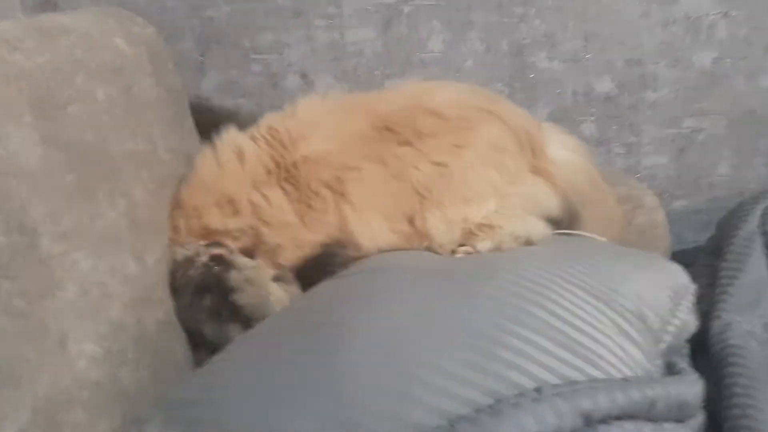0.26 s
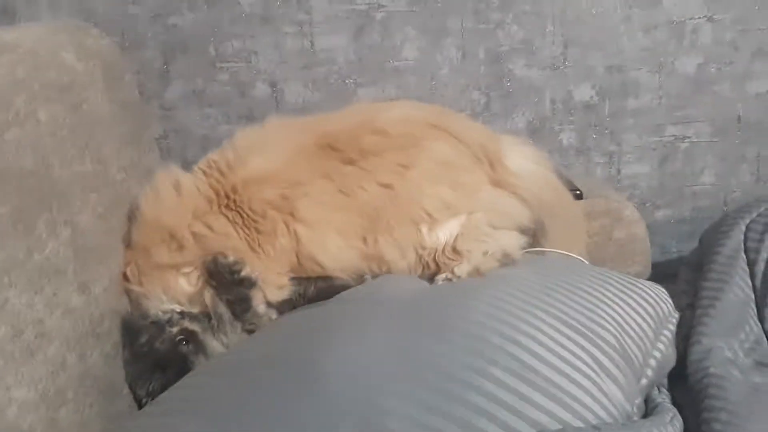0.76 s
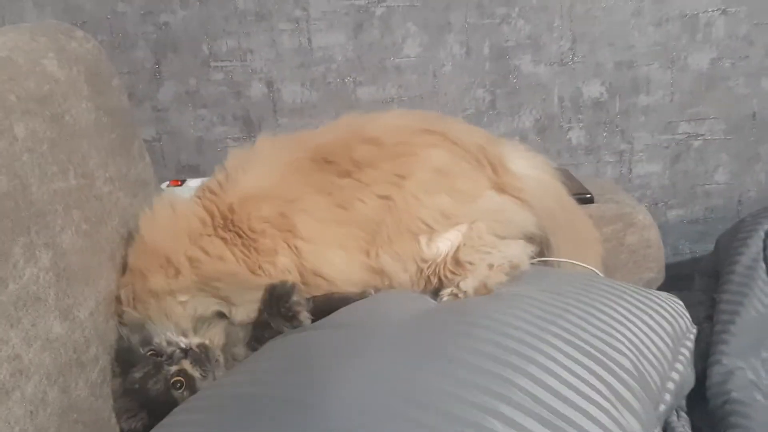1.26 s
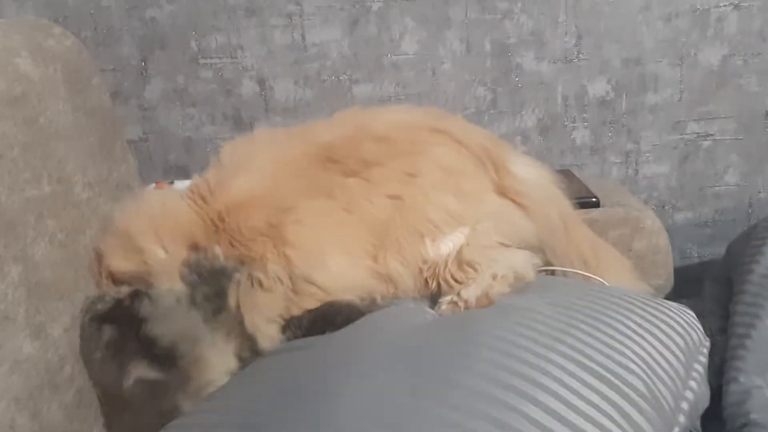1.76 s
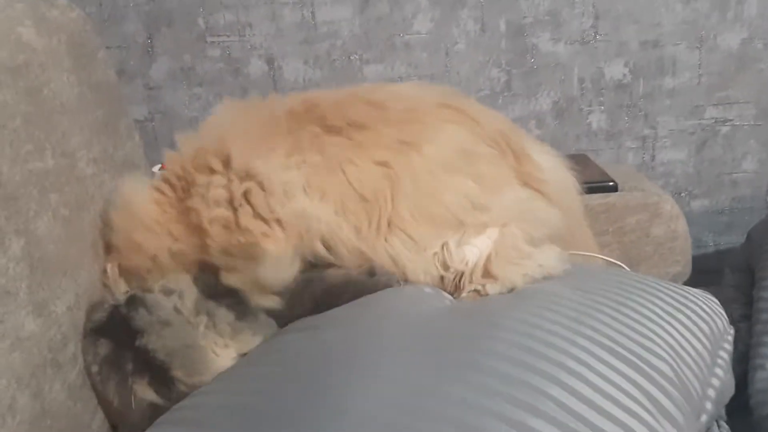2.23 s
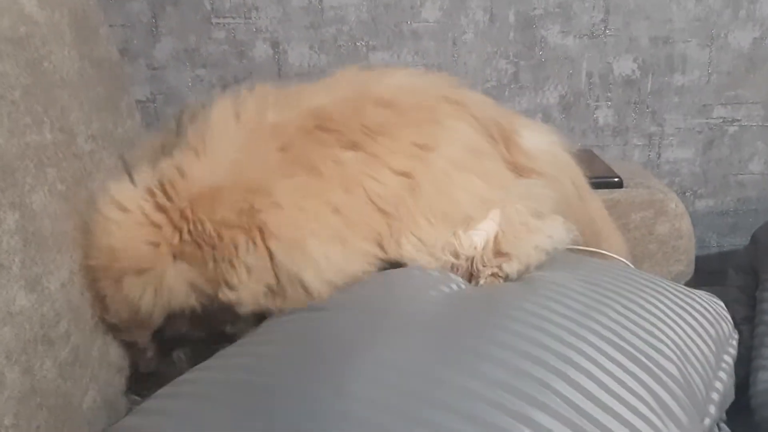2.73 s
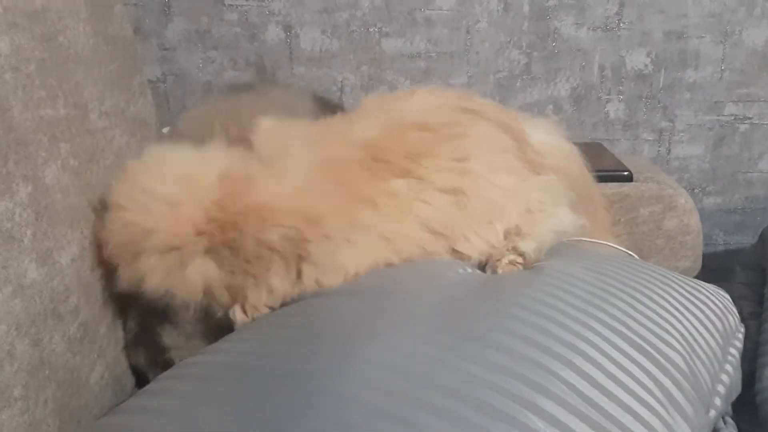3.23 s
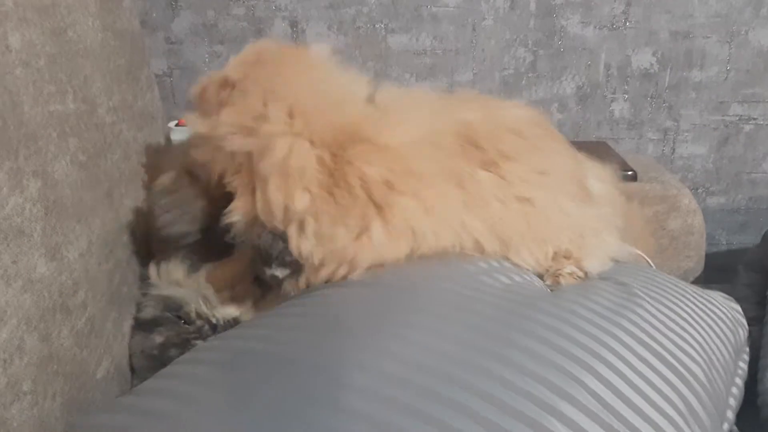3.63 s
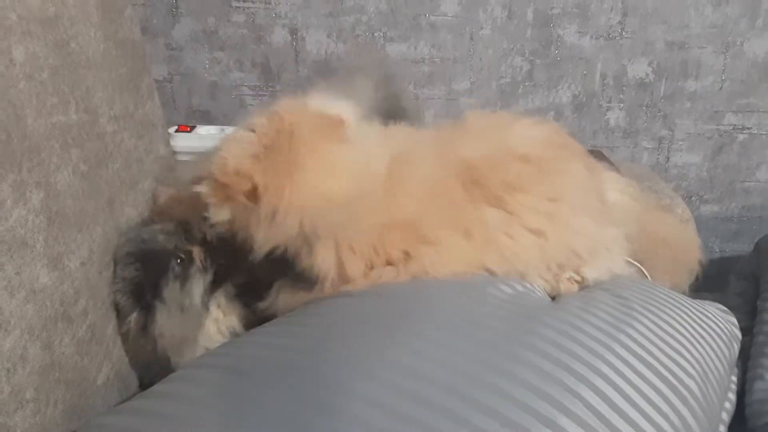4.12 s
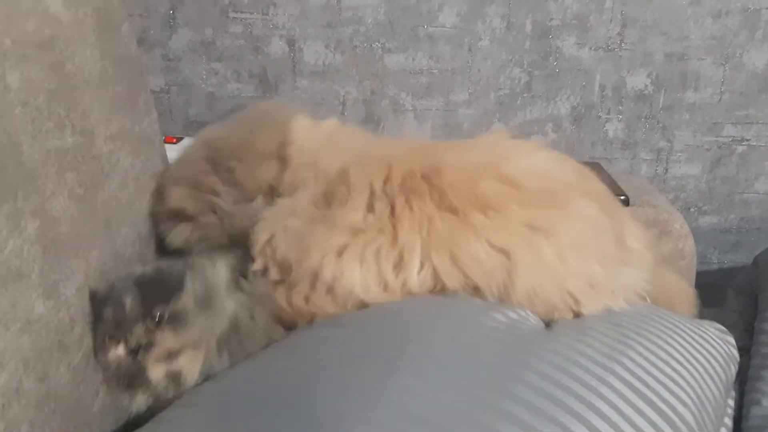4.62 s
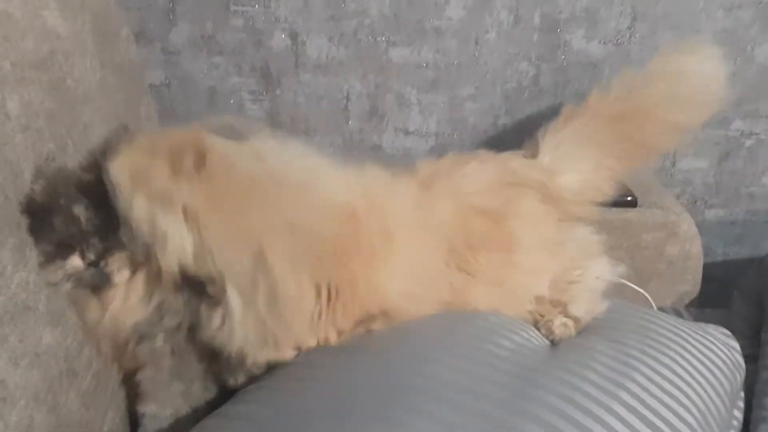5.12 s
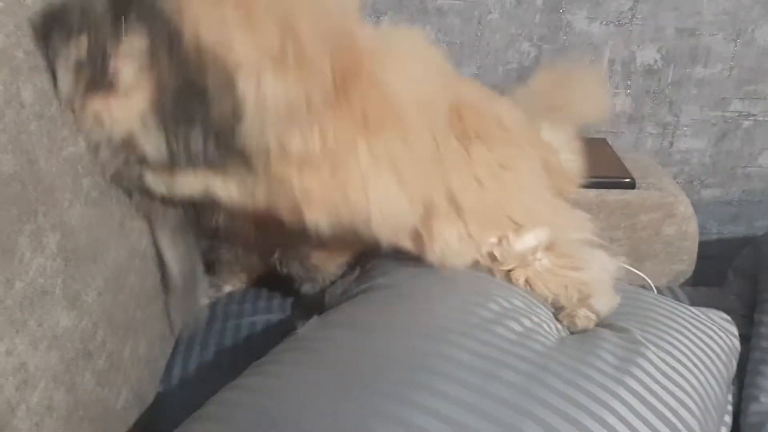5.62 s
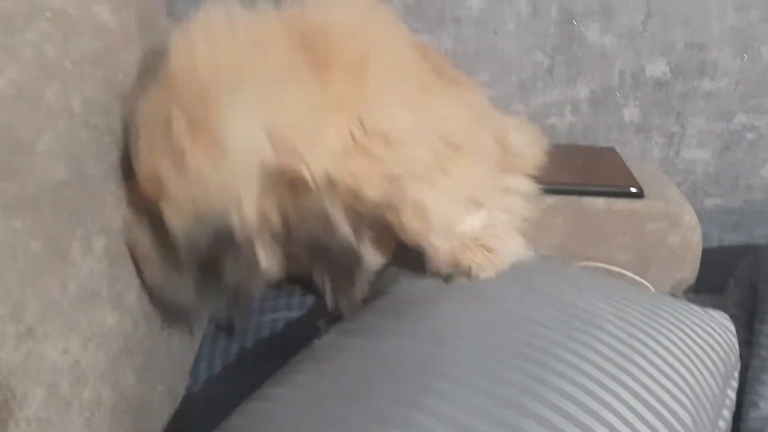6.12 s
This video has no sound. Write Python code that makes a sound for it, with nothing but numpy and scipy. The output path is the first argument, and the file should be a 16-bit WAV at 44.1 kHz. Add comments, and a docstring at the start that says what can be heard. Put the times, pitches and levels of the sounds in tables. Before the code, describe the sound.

Two cats scuffle on a sofa in a small room, heard close and slightly left over a low hum. A rough cry already under way ends in a plunging squeal; a snarl and a soft mew follow. A yelp runs into a yowl and a loud scream, then snarls and a hoarse squall. After that come only low thumps, fur rustles and a sharp late knock.

```python
"""A rough cry is already sounding over a low room hum; it ends in a squeal.
Two cats wrestle on a sofa in a small room: mews, yowls, a scream and a squall, with short snarls and yelps.
Vocal fold pulses and puffs of air ring throat, mouth and upper resonances; effort and an opening mouth brighten.
Bodies excite the sofa's low modes over cushion rumble; filtered noise makes hisses, fur strokes and claw clicks.
Knocks on something hard come late; thin whistles are faint sines. A short room tail surrounds the near sounds."""
import sys
import numpy as np
from scipy import signal
from scipy.fft import rfft, irfft
from scipy.io import wavfile
from scipy.ndimage import uniform_filter1d

SR = 44100
rng = np.random.default_rng(int(sys.argv[2]) if len(sys.argv) > 2 else 0)


def dump_mix(stems):
    """Bounce the given channels to the path in sys.argv[1] as a 16-bit WAV at rate SR."""
    frames = np.atleast_2d(stems).T  # one column per channel
    limited = np.clip(frames, -1, 1)  # hard clip at full scale
    pcm = np.round(limited * 32767).astype(np.int16)
    wavfile.write(sys.argv[1], SR, pcm)


N = 280917


def amp(db):
    """Decibels to gain."""
    return 10 ** (np.asarray(db) / 20)


def unit(x):
    """Scales to an rms of one."""
    return x / np.sqrt(np.mean(x ** 2) + 1e-20)


def steady(x):
    """Holds the rms at one from moment to moment."""
    power = uniform_filter1d(uniform_filter1d(x ** 2, size=700), size=700)
    return x / np.sqrt(abs(power) + 1e-14)


def read(points, hz):
    """Reads a spectrum on a log-frequency axis."""
    f, value = np.transpose(points)
    return np.interp(np.log(hz + 1), np.log(f + 1), value)


def add(mix, start_s, sound):
    """Adds a sound to the mix at start_s, clipped to the mix."""
    at = round(start_s * SR)
    sound = sound[max(-at, 0):]
    part = mix[max(at, 0):][:len(sound)]
    part += sound[:len(part)]


def colour(x, points, size=2048):
    """Causal minimum-phase filter with the given spectrum."""
    log_gain = np.log(amp(read(points, abs(np.fft.fftfreq(size, 1 / SR)))))
    taps = np.fft.ifft(np.exp(np.conj(signal.hilbert(log_gain)))).real
    return signal.oaconvolve(x, taps)[:len(x)]


def wander(n, hz):
    """Smooth random curve of rms one, rolled off above hz."""
    rolloff = 1 + (np.fft.rfftfreq(n, 1 / SR) / hz) ** 4
    return unit(irfft(rfft(rng.standard_normal(n)) / rolloff, n))


def resonate(x, hz, width_hz):
    """A resonance of gain one that follows the curve hz."""
    turn = np.exp(2j * np.pi * np.cumsum(hz) / SR)
    r = np.exp(-np.pi * width_hz / SR)
    return 2 * (turn * signal.lfilter([1 - r], [1, -r], x / turn)).real


def formant(x, hz, width_hz, count=6):
    """A steep-sided resonance: a wider one applied several times over."""
    for _ in range(count):
        x = resonate(x, hz * np.ones(len(x)), np.sqrt(2) * width_hz)
    return x


def pulses(turns, sizes):
    """One band-limited pulse at each whole turn."""
    at = np.flatnonzero(np.diff(np.floor(turns)) > 0)
    late = (np.floor(turns[at + 1]) - turns[at]) / (turns[at + 1] - turns[at])
    k, out = np.arange(-8, 9), np.zeros(len(turns))
    shape = np.sinc(k - late[:, None]) * np.hanning(len(k))
    np.add.at(out, np.clip(at[:, None] + k, 0, len(out) - 1), sizes[at, None] * shape)
    return out


def larynx(hz, rough, jitter, doubling, hiss, clean_hz):
    """Strained folds pulse unevenly, strong-weak; above clean_hz harmonics give way to rushing air."""
    n = len(hz)
    turns = np.cumsum(hz * (1 + jitter * rough * wander(n, 170) + 0.0076 * wander(n, 63))) / SR
    beat = 1 + np.clip(doubling * rough, 0, .9) * np.cos(np.pi * turns)
    folds = steady(pulses(turns, beat * np.exp(0.14 * rough * wander(n, 250))))
    puffs = unit((.35 + np.exp(-(turns % 1) / .22)) * rng.standard_normal(n))
    clean = 1 / (1 + (np.fft.rfftfreq(n, 1 / SR) / clean_hz) ** 8)
    drive = irfft(rfft(folds) * np.sqrt(clean) + rfft(puffs) * np.sqrt(1 - clean), n)
    low_air = irfft(rfft(puffs) * np.sqrt(clean), n)
    return folds, puffs, drive + hiss * (rough + 0.35) * low_air


# throat colour: f/Hz, relative level/dB
THROAT_COLOUR = [(120, -19.5), (220, -5.5), (330, 1.5), (520, -4.5), (760, 5), (1050, 6.5), (1400, -1.5),
                 (2200, -35)]


def throat_part(folds, drive, throat_hz, chest_db):
    """The throat rings and flutters; each closing of the folds also thuds in the chest."""
    throat = steady(colour(formant(drive, throat_hz, 1300), THROAT_COLOUR))
    throat = throat * amp(2.49 * wander(len(drive), 30))
    return throat + amp(chest_db) * steady(formant(folds, 230, 360, count=3))


# mouth colour: f/Hz, relative level/dB
MOUTH_COLOUR = [(500, -1), (900, -13.5), (1200, 1.5), (1900, -1.5), (2080, 1), (2350, -3.5), (2900, 1),
                (3400, -2), (4000, -10), (5500, -34.5), (8000, -67.5)]
TIP_WIDTH_HZ = 146
FIXED_HZ, FIXED_DB = 2270, -14.5  # weak resonance that stays put while the mouth moves


def mouth_part(drive, hz, mouth_hz, width_hz, ring_db, shoulder_db, strain_db):
    """A moving sharp-tipped peak with a shoulder below; higher notes wake a further peak above."""
    peak = formant(drive, mouth_hz, width_hz)
    peak = peak + amp(ring_db) * resonate(peak, mouth_hz, TIP_WIDTH_HZ)
    shoulder = amp(shoulder_db) * formant(drive, 0.72 * mouth_hz, 898)
    strain_gain = amp(strain_db + 11.6 * np.log2(hz / 500))  # 11.6 dB per octave of pitch
    strain = strain_gain * formant(drive, 1.484 * mouth_hz, 1200)
    fixed = amp(FIXED_DB) * formant(drive, FIXED_HZ, 1200)
    return steady(colour(peak + shoulder + strain + fixed, MOUTH_COLOUR))


# upper colour: f/Hz, relative level/dB
UPPER_COLOUR = [(2600, -34.5), (3400, -17.5), (3900, -3), (4700, -4.5), (5400, -4), (6300, -6), (7000, -17),
                (7800, -19.5), (8500, -38.5), (9600, -27.5), (11800, -20.5), (15500, -14)]
MID_EFFORT_DB, MID_MOUTH_HZ = -32.5, 1900
TOP_HZ = 7650


def upper_part(drive, puffs, rough, mouth_hz, upper_hz, spread_db, top_db):
    """The top of the voice is partly air, flutters, and moves slightly with the mouth."""
    n = len(drive)
    air = (drive + 2.5 * rough * puffs) * amp(0.49 * wander(n, 60))
    moving_hz = upper_hz * (mouth_hz / MID_MOUTH_HZ) ** 0.14
    upper = steady(colour(formant(air, moving_hz, 2100) + amp(spread_db) * air, UPPER_COLOUR))
    top = amp(top_db) * unit(formant(air, TOP_HZ, 750))
    return (upper + top) * amp(1.423 * wander(n, 45))


THROAT_DB_PER_EFFORT_DB, UPPER_DB_PER_EFFORT_DB = 0.49, 1.35
THROAT_DB_PER_OCT, UPPER_DB_PER_OCT = -5.5, 1  # per octave of mouth resonance
FADE_S = 0.016
RASP_DB, RASP_HZ = 2.5, 90


def call(rows, throat_db, upper_db, jitter, doubling, hiss, clean_hz, width_hz, ring_db, shoulder_db,
         strain_db, throat_hz, upper_hz, spread_db, top_db, chest_db=-18):
    """Folds and air ring three resonators; a soft call is mostly throat, a hard, open one bright."""
    s, *columns = np.transpose(rows)
    t = np.arange(s[0], s[-1], 1 / SR)
    hz, rough, mouth_hz, effort_db = (np.interp(t, s, c) for c in columns)
    rough = np.clip(rough, 0, 1)
    folds, puffs, drive = larynx(hz, rough, jitter, doubling, hiss, clean_hz)
    throat = throat_part(folds, drive, throat_hz, chest_db)
    mouth = mouth_part(drive, hz, mouth_hz, width_hz, ring_db, shoulder_db, strain_db)
    upper = upper_part(drive, puffs, rough, mouth_hz, upper_hz, spread_db, top_db)

    push_db, opening_oct = effort_db - MID_EFFORT_DB, np.log2(mouth_hz / MID_MOUTH_HZ)
    throat_gain = amp(throat_db + THROAT_DB_PER_EFFORT_DB * push_db + THROAT_DB_PER_OCT * opening_oct)
    upper_gain = amp(upper_db + UPPER_DB_PER_EFFORT_DB * push_db + UPPER_DB_PER_OCT * opening_oct)
    voice = amp(effort_db) * mouth + throat_gain * throat + upper_gain * upper
    fade = np.sin(np.pi / 2 * np.clip(np.minimum(t - t[0], t[-1] - t) / FADE_S, 0, 1))
    rasp = amp(RASP_DB * rough * wander(len(t), RASP_HZ))
    out = np.zeros(N)
    add(out, s[0], voice * fade * rasp)
    return out


# cry: t/s, pitch f/Hz, roughness 0-1, mouth f/Hz, effort level/dB
CRY_COURSE = [(-.02, 402.3, 0.24, 2200, -31), (.005, 402.6, 0.31, 2130, -34.5),
              (.033, 373.4, 0.18, 2200, -31.5), (.055, 374, 0, 1940, -35), (.09, 374.3, 0.18, 2350, -32.5),
              (.14, 355, 0.18, 2420, -32.5), (.17, 317.4, 0.6, 2340, -36.5), (.195, 296, 0.7, 2300, -33)]


def cry():
    """Falling, roughening pitch with a wide mouth resonance."""
    return call(CRY_COURSE, throat_db=-46.5, upper_db=-56, jitter=0.07, doubling=.47, hiss=1.0,
                clean_hz=6000, width_hz=1310, ring_db=-5, shoulder_db=-3.5, strain_db=-16,
                throat_hz=540, upper_hz=4500, spread_db=-9.0, top_db=-37)


# room air: f/Hz, relative level/dB per Hz
AIR_COLOUR = [(25, -24), (50, -11), (90, -10), (140, -5), (200, -2), (300, -3), (400, -6), (520, -5),
              (750, -11), (1100, -20), (1800, -35), (3600, -45), (4800, -30), (5800, -31), (7200, -42),
              (8600, -56), (10000, -49), (12000, -39), (15500, -41)]
# hum: f/Hz, level/dB before port gain
HUM_TONES = [(192, -60.5), (288, -60), (488, -61.5)]
# left-right likeness: f/Hz, likeness 0-1
LIKENESS = [(60, 0.86), (250, 0.89), (600, 0.6), (1200, 0.52), (2500, 0.062), (15000, 0)]
AIR_DB = -51  # before port gain


def background(waver=0.46):
    """Dull noise, nearly mono in the bass and unlike in the treble, with a wavering hum."""
    hz = np.fft.rfftfreq(N, 1 / SR)
    a, b = rfft(rng.standard_normal((2, N)))
    same = np.clip(read(LIKENESS, hz), -1, 1)
    pair = np.array([a, same * a + np.sqrt(1 - same ** 2) * b])
    air = unit(irfft(pair * amp(read(AIR_COLOUR, hz)), N))
    hum = np.zeros(N)
    for f, db in HUM_TONES:
        swell = 1 + waver * wander(N, 3.1)
        turns = np.cumsum(f + 6 * wander(N, 7.86)) / SR
        hum += amp(db) * unit(swell * np.sin(2 * np.pi * turns))
    # left and right port gains/dB
    return (amp(AIR_DB) * air + hum) * amp([[-.8], [.8]])


# cushion rumble: f/Hz, relative level/dB
CUSHION_COLOUR = [(20, -37.5), (35, -18), (48, 5.5), (65, -9), (88, 0.5), (130, -3), (220, -19.5),
                  (600, -33), (2000, -79)]
RUMBLE_DB, REST_DB = -62.5, -80  # added at middling struggle, at rest; before port gain
RUMBLE_DB_PER_STRUGGLE_DB, SETTLE_S = 0.15, 0.037


def cushions(struggle):
    """Shifting weight makes the sofa rumble, the more the louder the voices and blows."""
    window = np.hanning(round(2 * SETTLE_S * SR))
    power = signal.fftconvolve(struggle ** 2, window / window.sum(), "same")
    vigour = np.sqrt(abs(power)) / amp(MID_EFFORT_DB)
    rumble = unit(colour(rng.standard_normal(N), CUSHION_COLOUR, size=8192))
    return rumble * (amp(REST_DB) + amp(RUMBLE_DB) * vigour ** RUMBLE_DB_PER_STRUGGLE_DB)


# squeal: t/s, pitch f/Hz, roughness 0-1, mouth f/Hz, effort level/dB
SQUEAL_COURSE = [(.125, 616, 0.18, 2730, -34), (.178, 546.3, 0.75, 2160, -50),
                 (.205, 505.7, 0.22, 1920, -31), (.228, 452.6, 0.14, 1740, -38.5),
                 (.243, 374.2, 0.32, 1690, -32.5), (.256, 309, 0.58, 1870, -38), (.32, 286, .5, 1900, -59)]


def squeal():
    """High pitch plunging, with a broad airy top."""
    return call(SQUEAL_COURSE, throat_db=-41.5, upper_db=-54.5, jitter=0.055, doubling=0.15, hiss=0.7,
                clean_hz=3800, width_hz=1780, ring_db=-23, shoulder_db=-34, strain_db=-20,
                throat_hz=540, upper_hz=5400, spread_db=21, top_db=-15)


# landings on the cushions: t/s, relative level/dB, factor on sofa f
LANDINGS = [(0.166, -27, 1.23), (0.512, -32.5, 1.34), (2.336, -34.5, 1.06), (3.218, -37, 1.02),
            (4.58, -20, 1.32), (4.635, -21.5, 1.24), (4.652, -35.5, 2.33), (4.685, -28, 0.85),
            (4.759, -34, 0.88), (4.851, -22.5, 1.31), (4.878, -24, 0.93), (5.211, -27.5, 1.07),
            (5.462, -22.5, 0.92), (5.623, -29, 1.2), (5.655, -30, 0.89)]
# sofa modes: f/Hz, relative level/dB, t60/s
SOFA_MODES = [(53.4, -17.5, 0.28), (87.4, -2.5, 0.16), (110, 9.5, 0.052), (169, -11.5, 0.093),
              (262.5, -32.5, 0.92)]


def thumps(rise_s=0.011):
    """Soft blows swell and die in the sofa's low modes."""
    out, t = np.zeros(N), np.arange(SR // 2) / SR
    for s, db, pitch in LANDINGS:
        ring = sum(amp(mode_db - 60 * t / t60_s) * np.sin(2 * np.pi * hz * pitch * t)
                   for hz, mode_db, t60_s in SOFA_MODES)
        add(out, s, amp(db) * ring * (1 - np.exp(-(t / rise_s) ** 2)))
    return out


EDGE_DB, HOLD_RISE_DB, RELEASE_S = -18.5, 0.5, 0.056  # levels relative to effort


def burst(start_s, length_s, attack_s, effort_db, first_hz, last_hz, first_mouth_hz, last_mouth_hz, rough):
    """Course of a short call: attack, hold and release, while pitch and mouth glide evenly."""
    t = np.sort([0, attack_s, length_s - RELEASE_S, length_s])
    hz = np.interp(t, [0, length_s], [first_hz, last_hz])
    mouth_hz = np.interp(t, [0, length_s], [first_mouth_hz, last_mouth_hz])
    level_db = effort_db + np.array([EDGE_DB, 0, HOLD_RISE_DB, EDGE_DB])
    return np.transpose([start_s + t, hz, np.full(len(t), rough), mouth_hz, level_db])


# snarls: t/s, length/s, attack/s, effort level/dB, first and last pitch f/Hz, first and last mouth f/Hz,
# roughness 0-1, throat, upper and strain level/dB, upper f/Hz, top level/dB
SNARL_CALLS = [(0.549, 0.16, 0.034, -35, 270.7, 164.7, 1770, 2250, 0.61, -39, -51.5, 10.5, 5800, -29),
               (2.628, 0.11, 0.043, -39, 346.5, 274, 1590, 1450, 0.38, -43.5, -44.5, -18, 5400, -43),
               (3.195, .082, 0.027, -34, 227.4, 157.7, 1680, 1770, 0.604, -39.5, -51.5, -39, 4800, -9),
               (3.805, 0.13, 0.041, -33, 222.1, 190.2, 1374, 1480, .6, -39, -53, -26, 4800, -22)]


def snarls():
    """Short, low, falling calls with a heavy chest thud."""
    out = np.zeros(N)
    for *course, throat_db, upper_db, strain_db, upper_hz, top_db in SNARL_CALLS:
        out += call(burst(*course), throat_db, upper_db, chest_db=-6.5, jitter=.12, doubling=.22, hiss=0.93,
                    clean_hz=4500, width_hz=1910, ring_db=1.5, shoulder_db=1.5, strain_db=strain_db,
                    throat_hz=397, upper_hz=upper_hz, spread_db=8, top_db=top_db)
    return out


# spits of air: t/s, length/s, level/dB, f/Hz
SPITS = [(0.621, 0.098, -61, 6500), (0.757, 0.09, -59.5, 6000), (2.015, 0.084, -53.5, 4150),
         (3.233, 0.064, -61, 6000), (4.132, 0.22, -61.5, 7060), (4.194, 0.11, -59, 5700)]


def hisses(width_hz=1500, flutter_db=2.5):
    """Air spat past a cat's teeth swells and fades in one high resonance."""
    out = np.zeros(N)
    for s, length_s, db, hz in SPITS:
        n = round(length_s * SR)
        air = unit(formant(rng.standard_normal(n), hz, width_hz))
        add(out, s, amp(db + flutter_db * wander(n, 70)) * np.hanning(n) * air)
    return out


# fur strokes: t/s, length/s, level/dB
STROKES = [(0.652, 0.7, -60), (1.57, 0.16, -67), (3.37, .16, -58), (4.475, 0.24, -59.5),
           (4.543, 0.62, -64.5), (5.251, 0.67, -67), (5.694, 0.25, -55.5)]
# cloth colour, also for claws: f/Hz, relative level/dB
CLOTH_COLOUR = [(600, 14), (2000, 8), (3500, 3.5), (6000, 1), (7500, 1), (8600, -17), (12000, -6),
                (15500, -10)]


def rustles():
    """Fur brushes the cloth in grainy strokes that swell and fade."""
    strokes = np.zeros(N)
    for s, length_s, db in STROKES:
        add(strokes, s, amp(db) * np.hanning(round(length_s * SR)))
    grain = amp(2.7 * wander(N, 1100) + 4.4 * wander(N, 23))
    return strokes * unit(colour(rng.standard_normal(N) * grain, CLOTH_COLOUR))


# mew: t/s, pitch f/Hz, roughness 0-1, mouth f/Hz, effort level/dB
MEW_COURSE = [(.748, 383, 0.17, 1900, -68), (.79, 378, .04, 1900, -50), (.805, 406, 0.043, 1890, -49.5),
              (.824, 449.7, 0.047, 1970, -46.5), (.876, 477.3, 0.025, 1900, -41),
              (.902, 489, 0.022, 2220, -46), (.93, 482, .03, 1950, -45.5), (.99, 445.5, .04, 1530, -57),
              (1.055, 366.4, 0.052, 1290, -60.5)]


def mew():
    """Soft, nearly clean pitch rises and falls as the mouth closes."""
    return call(MEW_COURSE, throat_db=-40.0, upper_db=-56.0, jitter=0.081, doubling=0.24, hiss=0.59,
                clean_hz=4500, width_hz=2100, ring_db=3.5, shoulder_db=-61, strain_db=-4,
                throat_hz=530, upper_hz=6000, spread_db=-13, top_db=-15)


# whistle arches: t/s, length/s, top f/Hz, drop at the ends/Hz, level/dB
WHISTLE_ARCHES = [(0.772, 0.18, 11400, 335, -79), (0.938, 0.12, 12900, 587, -72),
                  (1.07, 0.42, 14500, 3310, -79), (1.178, 0.2, 9360, 550, -75.5),
                  (3.62, 0.42, 12530, 900, -81)]


def whistles(waver_hz=90, flicker_db=3):
    """A faint, thin sine rises and falls far above the voices."""
    out = np.zeros(N)
    for s, length_s, top_hz, drop_hz, db in WHISTLE_ARCHES:
        u = np.linspace(-1, 1, round(length_s * SR))
        hz = top_hz - drop_hz * u ** 2 + waver_hz * wander(len(u), 150)
        level = amp(db + flicker_db * wander(len(u), 27)) * np.sqrt(1 - u ** 2)
        add(out, s, level * np.sin(2 * np.pi * np.cumsum(hz) / SR))
    return out


# yelps: same columns as the snarls
YELP_CALLS = [(1.68, 0.15, 0.04, -29, 373.3, 364.3, 2120, 2100, 0.41, -38, -57, -28, 5200, -18),
              (2.314, .088, 0.062, -34, 414, 469.3, 1847, 1710, 0.56, -43.5, -54.5, 3, 4500, -21.5)]


def yelps():
    """Short, higher calls with a sharply ringing mouth."""
    out = np.zeros(N)
    for *course, throat_db, upper_db, strain_db, upper_hz, top_db in YELP_CALLS:
        out += call(burst(*course), throat_db, upper_db, jitter=0.086, doubling=0.56, hiss=0.96,
                    clean_hz=3018, width_hz=1320, ring_db=5.5, shoulder_db=5.5, strain_db=strain_db,
                    throat_hz=884, upper_hz=upper_hz, spread_db=7.5, top_db=top_db)
    return out


# yowl: t/s, pitch f/Hz, roughness 0-1, mouth f/Hz, effort level/dB
YOWL_COURSE = [(1.78, 385.6, 0.47, 2010, -41), (1.825, 397, 0.49, 2000, -34),
               (1.852, 405.7, 0.53, 2040, -23.5), (1.88, 363.3, 0.45, 2100, -19.5),
               (1.905, 360.9, 0.34, 2130, -25), (1.96, 351, 0.37, 2030, -35), (1.99, 351.8, .35, 2040, -32),
               (2.04, 363, 0.32, 1830, -34.5), (2.075, 399.7, 0.34, 1600, -36),
               (2.11, 400.6, 0.12, 1373, -44), (2.19, 369.7, 0.0506, 1200, -36),
               (2.26, 350.3, .25, 1273, -40.5), (2.33, 391, 0.4, 1397, -41)]


def yowl():
    """Long call through a narrow mouth resonance that sinks, airy above its low harmonics."""
    return call(YOWL_COURSE, throat_db=-40, upper_db=-56.5, jitter=.045, doubling=0.25, hiss=0.512,
                clean_hz=2350, width_hz=780, ring_db=-3.5, shoulder_db=-6.5, strain_db=-15,
                throat_hz=790, upper_hz=5140, spread_db=-10.0, top_db=-34)


# scream: t/s, pitch f/Hz, roughness 0-1, mouth f/Hz, effort level/dB
SCREAM_COURSE = [(2.385, 475.7, 0.35, 1680, -40), (2.425, 544, .38, 1990, -28.5),
                 (2.46, 498.4, .62, 2010, -25.5), (2.485, 508.5, .55, 2020, -27.5),
                 (2.52, 543.4, 0.695, 1940, -23.5), (2.543, 563.3, .15, 1762, -18.5),
                 (2.553, 609.3, 0.11, 1830, -24.5), (2.564, 634, 0.11, 1900, -14.5),
                 (2.571, 648.5, .7, 1547, -21.5), (2.58, 638, 0.13, 1906, -19.5),
                 (2.607, 503.3, 0.08, 1598, -24), (2.63, 411.7, 0.22, 1437, -27.5),
                 (2.66, 347, 0.62, 1590, -44.5)]


def scream():
    """Loud pitch climbs, then drops; rough folds beat strongly."""
    return call(SCREAM_COURSE, throat_db=-40.0, upper_db=-59.5, jitter=0.05, doubling=0.82, hiss=0.85,
                clean_hz=5200, width_hz=1070, ring_db=1.5, shoulder_db=-3, strain_db=-8,
                throat_hz=797, upper_hz=4860, spread_db=8, top_db=-40)


# claw catches: t/s, relative level/dB, e-fold decay/s
CATCHES = [(3.648, -45, .001), (5.335, -62, .003), (5.36, -62, .003), (5.721, -48, .002),
           (5.726, -41, .003), (5.755, -49, .01)]


def claws():
    """Threads snap past a claw in short clumps of clicks: decaying spiky noise."""
    out, t = np.zeros(N), np.arange(SR // 5) / SR
    for s, db, decay_s in CATCHES:
        add(out, s, amp(db) * unit(rng.standard_normal(len(t)) ** 3) * np.exp(-t / decay_s))
    return colour(out, CLOTH_COLOUR)


# squall: t/s, pitch f/Hz, roughness 0-1, mouth f/Hz, effort level/dB
SQUALL_COURSE = [(3.968, 270.5, 0.61, 1430, -52), (3.99, 297.7, 0.26, 1400, -34.5),
                 (4.004, 295, 0.11, 1460, -27), (4.018, 303.5, 0.5, 1550, -28.5),
                 (4.032, 315.1, 0.19, 1850, -28), (4.063, 343.4, 0.57, 1970, -30),
                 (4.086, 345.7, 0.44, 1840, -41), (4.125, 336.7, 0.74, 1910, -44.5),
                 (4.165, 347.4, 0.45, 2110, -30.5), (4.187, 351.3, 0.7, 1950, -30),
                 (4.226, 354.3, 0.34, 2110, -33.5), (4.258, 336, 0.35, 2080, -40)]


def squall():
    """Rough, uneven call as the mouth resonance rises."""
    return call(SQUALL_COURSE, throat_db=-46.5, upper_db=-60.5, jitter=0.05, doubling=0.57, hiss=0.99,
                clean_hz=5000, width_hz=1100, ring_db=0, shoulder_db=-5.0, strain_db=-4.5,
                throat_hz=470, upper_hz=4800, spread_db=-12, top_db=-8)


# knocks on something hard: t/s, relative level/dB
KNOCK_HITS = [(4.682, -17), (4.996, -14), (5.794, -1), (5.803, -3), (5.82, -17), (5.829, -14), (5.977, -19)]
# knock colour: f/Hz, relative level/dB
KNOCK_COLOUR = [(150, -15), (450, 5.5), (750, 15.5), (1100, 4), (1700, -6), (3500, -9.5), (6000, -17),
                (8500, -50.5), (15000, -37)]


def knocks(decay_s=0.055):
    """A hard object knocks (impulse) and rattles briefly (decaying noise)."""
    out, t = np.zeros(N), np.arange(SR // 10) / SR
    for s, db in KNOCK_HITS:
        rattle = 0.03 * rng.standard_normal(len(t)) * np.exp(-t / decay_s)
        add(out, s, amp(db) * ((t == 0) + rattle))
    return colour(out, KNOCK_COLOUR)


# room decay: f/Hz, t60/s
ROOM_DECAY = [(150, .2), (600, .42), (2000, .4), (5000, .33), (14000, .08)]
# lingering narrow resonances: f/Hz, level/dB relative to the tail, t60/s
ROOM_LINGER = [(1550, -18, .3), (2090, -29, .3)]


def room(x, early_db=-11, tail_db=-16.5):
    """Near walls answer first; then comes a short tail, in which a few pitches linger."""
    t = np.arange(SR) / SR
    taps = rng.choice([-1., 1.], (2, SR)) * (rng.random((2, SR)) < 3000 / SR) * (t > .008)
    hz, frame_s, z = signal.stft(taps, SR, nperseg=256)
    fall = amp(-60 * frame_s / read(ROOM_DECAY, hz)[:, None])
    tail = signal.istft(z * fall, SR, nperseg=256)[1][:, :SR]
    linger = np.zeros((2, SR))
    for f, db, t60_s in ROOM_LINGER:
        ring = np.array([formant(side, f, 200, count=3) for side in taps])
        linger += amp(db) * unit(ring * amp(-60 * t / t60_s))
    early = np.zeros((2, SR))
    at = (SR * rng.uniform(.0005, .01, (2, 16))).astype(int)
    np.put_along_axis(early, at, rng.choice([-1., 1.], at.shape), 1)
    response = (amp(early_db) * unit(early) + amp(tail_db) * (unit(tail) + linger)) / np.sqrt(SR)
    return signal.fftconvolve(x[None], response, axes=1)[:, :N]


# lag of the right port, as sound bends round the recorder: f/Hz, phase/rad
PORT_LAG = [(0, 0), (860, .7), (1380, 1.8), (2700, 1.95), (3100, 4.4), (4740, 5.3), (7000, 8.0),
            (16000, 17.3)]
# left minus right: f/Hz, level/dB
PORT_LEAN = [(200, -2), (500, -2), (1200, 1.5), (2300, .5), (4400, -1.5), (8000, 3), (14000, 1.5)]


def ports(near):
    """The cats are to the left: the right port hears them later and coloured differently."""
    hz = np.fft.rfftfreq(2 * N, 1 / SR)
    lag = np.interp(hz, *np.transpose(PORT_LAG))
    lean = amp(read(PORT_LEAN, hz) / 2)
    pair = np.array([lean, np.exp(-1j * lag) / lean])
    return amp(-1.98) * irfft(rfft(near, 2 * N) * pair)[:, :N]


def scene():
    """Near sounds reach ports and room; sofa, whistles and background go straight to the ports."""
    voices = cry() + squeal() + snarls() + mew() + yelps() + yowl() + scream() + squall()
    blows = thumps()
    near = voices + hisses() + rustles() + amp(-0.5) * claws() + amp(-6.5) * knocks()
    # left and right port gains/dB
    sofa = (blows + cushions(voices + blows)) * amp([[-.7], [.7]])
    return ports(near) + room(near) + sofa + whistles() + background()


EDGE_HZ = 15850


def record(dry):
    """The recorder's band limit: a linear-phase low-pass."""
    taps = signal.firwin(511, EDGE_HZ, window=("kaiser", 9), fs=SR)
    return signal.oaconvolve(dry, taps[None], "same")


dry = scene()
out = record(dry)
dump_mix(out)
```